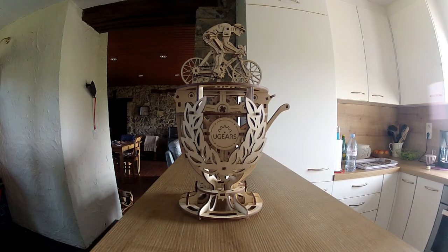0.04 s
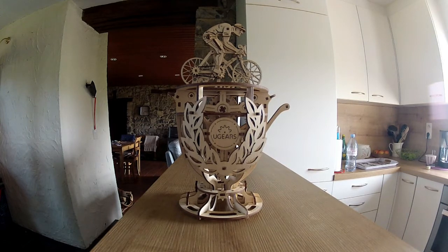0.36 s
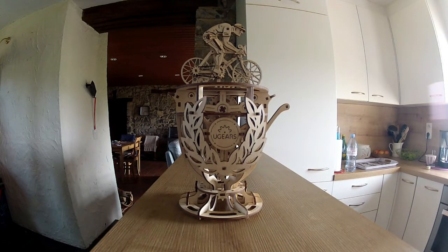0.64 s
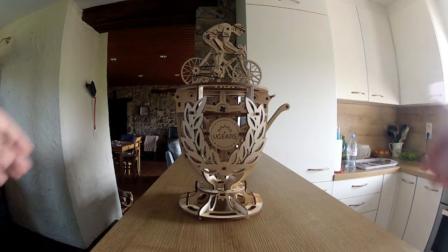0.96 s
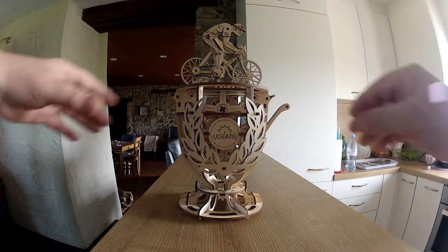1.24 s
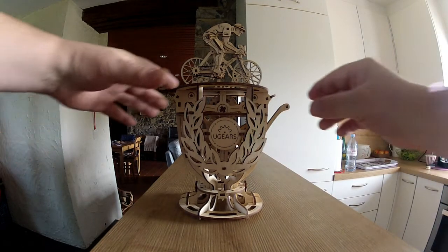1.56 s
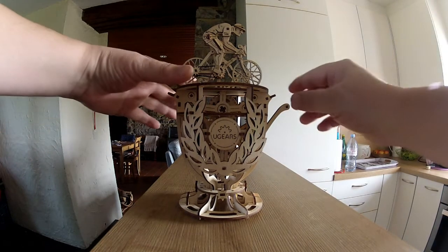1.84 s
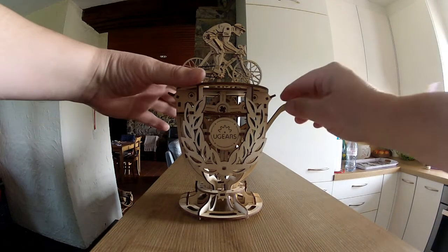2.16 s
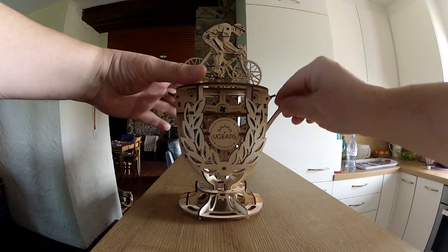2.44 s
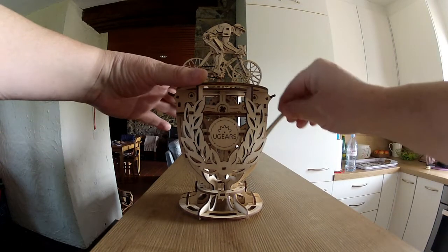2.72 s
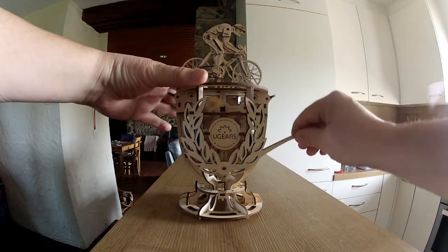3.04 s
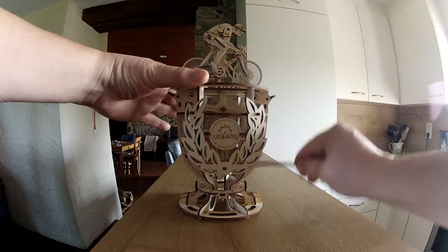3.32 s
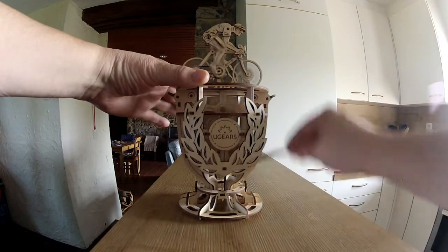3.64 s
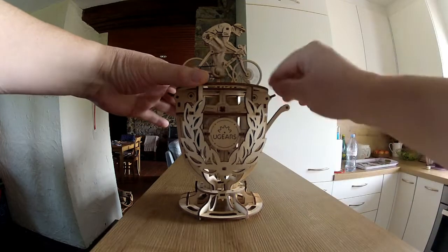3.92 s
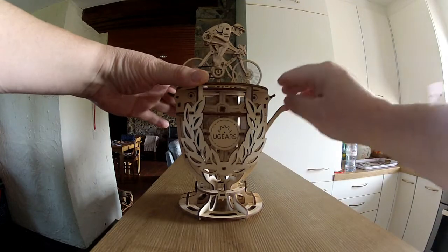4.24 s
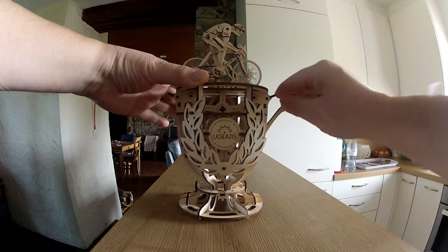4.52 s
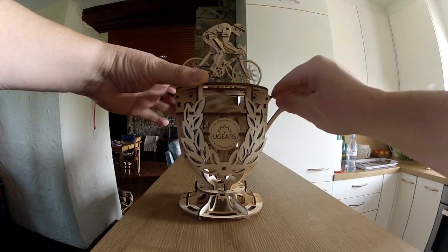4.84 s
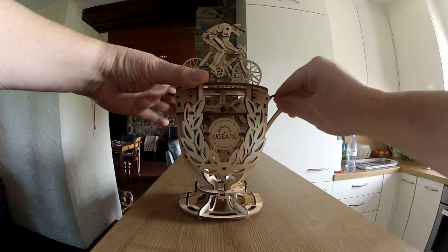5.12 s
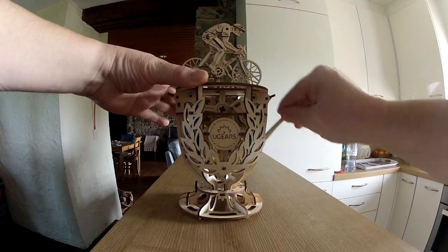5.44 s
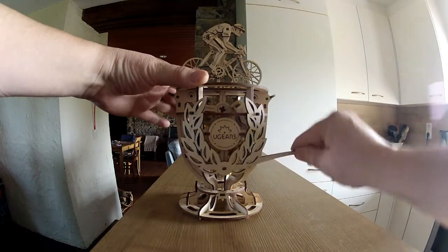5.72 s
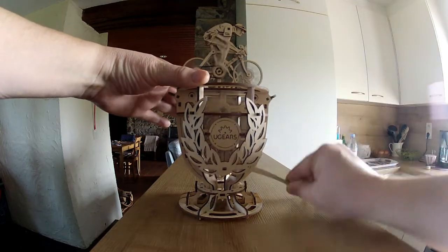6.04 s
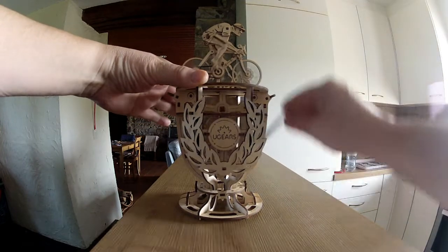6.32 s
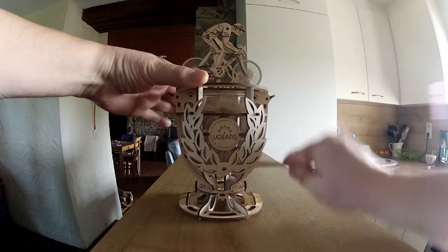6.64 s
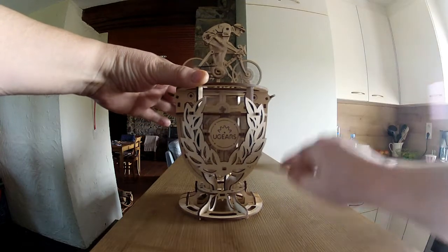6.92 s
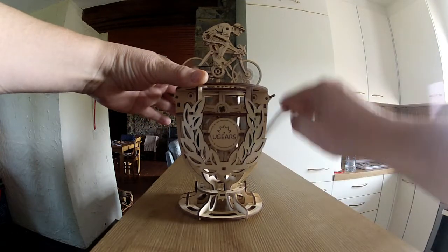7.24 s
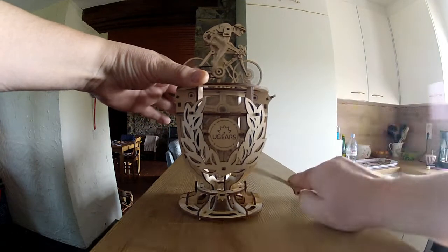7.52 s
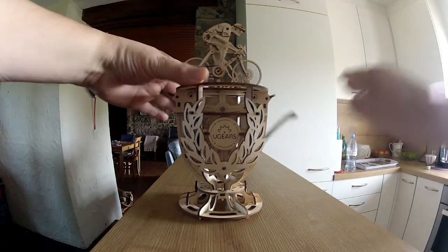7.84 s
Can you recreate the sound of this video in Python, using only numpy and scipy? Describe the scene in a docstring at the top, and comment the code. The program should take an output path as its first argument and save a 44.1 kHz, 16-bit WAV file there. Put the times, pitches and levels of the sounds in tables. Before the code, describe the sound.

In a quiet kitchen with a low appliance hum, a soft shuffle, a thin wooden rub and a hollow bump come first. Then the lever of a plywood gear model slides, catches with a knock and is pulled four times. Each pull shakes the hollow body and spins up the gears, which rattle as they slow while a ratchet clicks. The last pulls come closer together. The microphone is close, almost mono.

```python
"""A plywood gear model on a kitchen worktop, heard close up and almost in mono by a small camera.
Over the room tone come a soft shuffle, a thin rub of dry wood and a hollow bump. Then the slack lever
slides, catches and is pulled four times. Each pull judders the hollow frame and spins up the gears,
whose teeth rattle as they coast down while the pawl clicks. Throughout, the camera samples slowly
and holds each sample, which mirrors the sound into the treble."""
import sys
import numpy as np
from scipy import signal
from scipy.fft import rfft, irfft
from scipy.io import wavfile
from scipy.ndimage import uniform_filter1d

SR = 44100
rng = np.random.default_rng(int(sys.argv[2]) if len(sys.argv) > 2 else 0)


def store_pcm(level_fs):
    """Save levels as 16-bit WAV."""
    pcm = np.round(np.clip(level_fs, -1, 1) * 32767).astype(np.int16)
    wavfile.write(sys.argv[1], SR, np.atleast_2d(pcm).T)


N = 347067
TIME = np.arange(N) / SR
REFERENCE_TEETH_PER_S = 100  # the gear speed at which pace is 1

# ring of the small plywood gears: (frequency [Hz], level [dB])
GEAR_SPECTRUM = [(150, -21), (400, 5.5), (620, 1), (1000, -3.5), (1500, -5.5), (1900, -1.5), (2300, 3),
                 (2520, 3.5), (2700, 8.5), (3000, 1), (3400, -5.5), (3900, 1.5), (4900, -5), (6000, -13.5)]
# the slack lever slides before it bites: (start [s], end [s], hiss [Hz], hiss [dB], frame stir [dB])
LEVER_SLIDES = [(2.3, 3.3, 2570, -64, -49.5), (5.36, 6.0, 2560, -59.5, -46.5)]
# the lever catches a gear: (time [s], knock [dB], frame jolt [dB])
LEVER_CATCHES = [(2.94, -33.5, -32.5), (3.351, -28, -23), (3.662, -19, -39), (5.725, -22.5, -21.5),
                 (6.663, -11, -13), (7.075, -19.5, -16), (7.464, -19, -7), (7.778, -12.5, -45)]
# pulls of the lever: (time at the stop [s], stroke length [s], share spent speeding up [0-1],
# top speed [teeth/s], frame judder [dB], foot judder [dB])
LEVER_PULLS = [(3.42, .35, 0.92, 88.4, -24.5, -30), (6.031, 0.24, 0.93, 87, -23.5, -25.5),
               (6.759, 0.12, .45, 90, -23, -35), (7.528, .265, 0.76, 113, -17.5, -28.5)]


def undb(db):
    """Decibels to gain."""
    return 10 ** (np.asarray(db) / 20)


def unit(x):
    """Scale to rms 1."""
    return x / np.sqrt(np.mean(x ** 2))


def at_peak(x, db=0):
    """Scale to a peak level."""
    return undb(db) * x / np.abs(x).max()


def add(track, time, sound):
    """Mix a sound into a track at a time in seconds."""
    start = int(time * SR)
    track[start:start + len(sound)] += sound[:N - start]


def ring(x, response):
    """Pass a sound through an impulse response."""
    return signal.fftconvolve(x, response)[:len(x)]


def lowpass(x, hz, order=2):
    """Round off the treble."""
    return signal.sosfilt(signal.butter(order, hz, fs=SR, output="sos"), x)


def colour(points, size=8192):
    """Minimum-phase response of unit energy from (frequency [Hz], level [dB]) points."""
    hz, db = np.transpose(points)
    bins = np.maximum(np.fft.rfftfreq(size, 1 / SR), 1)
    gain = undb(np.interp(np.log(bins), np.log(hz), db))
    cepstrum = irfft(np.log(gain))
    cepstrum[1:size // 2] *= 2
    cepstrum[size // 2 + 1:] = 0
    response = irfft(np.exp(rfft(cepstrum)))
    return response / np.linalg.norm(response)


def modes(rows, size=8192):
    """Response of unit energy from damped modes: (frequency [Hz], width [Hz], level [dB])."""
    t = TIME[:size]
    response = sum(undb(db) * width * np.exp(-np.pi * width * t) * np.cos(2 * np.pi * hz * t)
                   for hz, width, db in rows)
    return response / np.linalg.norm(response)


def burst(t60, size=32768):
    """Noise of unit energy that dies by 60 dB in t60 seconds."""
    response = rng.standard_normal(size) * np.exp(-np.log(1000) * TIME[:size] / t60)
    return response / np.linalg.norm(response)


def strengths(spread_db):
    """Random gains scattered around 1."""
    return undb(spread_db * np.clip(rng.standard_normal(N), -2, 2))


def contacts(per_second, spread_db):
    """Random impacts of uneven strength."""
    struck = rng.random(N) < per_second / SR
    return struck * rng.choice([-1, 1], N) * strengths(spread_db)


def even(x, span_s):
    """Hold the rms near 1 over a short span, keeping the faster grain."""
    size = int(span_s * SR)
    power = uniform_filter1d(uniform_filter1d(x ** 2, size), size)
    return x / np.sqrt(np.abs(power) + 1e-12)


def swell(start, end, attack_s, release_s):
    """Rise from the start, hold until the end, then fade."""
    return np.clip((TIME - start) / attack_s, 0, 1) * np.clip(1 - (TIME - end) / release_s, 0, 1)


def steady_noise(response):
    """White noise through a response, at rms 1."""
    return unit(ring(rng.standard_normal(N), response))


def microphone_hiss():
    """Faint self-noise of the microphone channels."""
    # hiss spectrum: (frequency [Hz], density [dB])
    spectrum = [(60, -8.5), (400, -17.5), (1500, -22.5), (5000, -22)]
    return undb(-65) * steady_noise(colour(spectrum))


def kitchen():
    """Steady room tone with the low hum of an appliance."""
    # air of the quiet room: (frequency [Hz], density [dB])
    room_tone = [(15, -28), (25, -15.5), (54, -0.5), (71, -7.5), (101, -8), (156, -7), (174, -7), (244, -5),
                 (280, -6.5), (550, -14), (790, -21.5), (2730, -26), (5500, -30.5), (7150, -64),
                 (12100, -120)]
    # partials of the hum: (frequency [Hz], level [dB])
    hum_partials = [(50, -61.5), (99.5, -56.5)]
    air = undb(-52.5) * steady_noise(colour(room_tone))
    return air + sum(undb(db) * np.sin(2 * np.pi * hz * TIME) for hz, db in hum_partials)


def worktop():
    """Something shuffles on the worktop, with a tiny tick and a hollow bump."""
    # course of the shuffle: (time [s], level [dB])
    shuffle_levels = [(0, -50.5), (.13, -49), (.35, -48), (.5, -51.5), (.66, -51), (.82, -72), (1.1, -99)]
    # worktop resonances under the shuffle and the bump: (frequency [Hz], width [Hz], level [dB])
    shuffle_modes = [(272, 31, 12), (560, 35, 7.5), (640, 30, -17), (1960, 380, -10), (2620, 260, -19)]
    bump_modes = [(266, 37, 13.5), (430, 37, 2), (1700, 340, -15.5), (1940, 420, -13.5)]
    out = steady_noise(modes(shuffle_modes)) * undb(np.interp(TIME, *np.transpose(shuffle_levels)))
    blow = burst(t60=.33)
    blow[0] += .5  # the blow itself arrives ahead of its echoes
    bump = lowpass(ring(blow, modes(bump_modes)), hz=2590, order=4)
    add(out, time=.558, sound=at_peak(bump, db=-29.5))
    tick = ring(burst(t60=.04), modes([(3600, 400, 0)]))
    add(out, time=.14, sound=at_peak(tick, db=-42))
    return out


def friction_hiss(centre_hz):
    """Friction noise in one narrow resonance."""
    grain = lowpass(rng.standard_normal(N) + 1j * rng.standard_normal(N), hz=112)
    return unit(np.real(grain * np.exp(2j * np.pi * centre_hz * TIME)))


def rubbing():
    """Thin hisses: first as of dry wood rubbing, later from the sliding of the slack lever."""
    # opening rubs: (start [s], end [s], frequency [Hz], level [dB])
    early_rubs = [(0, 0.126, 2765, -54), (0.248, 0.663, 2605, -64.5)]
    rubs = sum(undb(db) * friction_hiss(hz) * swell(start, end, attack_s=.061, release_s=.18)
               for start, end, hz, db in early_rubs)
    slides = sum(undb(db) * friction_hiss(hz) * swell(start, end, attack_s=.21, release_s=.19)
                 for start, end, hz, db, _ in LEVER_SLIDES)
    return rubs + slides


def stroke(stop, length_s, share):
    """Speed of the lever, 0 to 1: it picks up evenly, then holds."""
    return np.clip((TIME - stop + length_s) / (length_s * share), 0, 1)


def lever(scrape_lead_s=.009):
    """The lever scrapes a tooth, knocks against the gear, rings briefly and sets loose parts buzzing."""
    # ring of the lever: (frequency [Hz], width [Hz], level [dB])
    lever_modes = [(2050, 440, -48), (2690, 160, 4), (2970, 270, -4.5), (3800, 570, -9.5)]
    wood, loose_parts = modes(lever_modes), colour(GEAR_SPECTRUM)
    out = np.zeros(N)
    for time, db, _ in LEVER_CATCHES:
        knock = wood + undb(6) * ring(wood, burst(t60=.022))
        buzz = undb(2) * ring(loose_parts, burst(t60=.08))
        scrape = ring(loose_parts, burst(t60=.072))
        add(out, time, at_peak(knock + buzz, db))
        add(out, time - scrape_lead_s, at_peak(scrape, db - 18))
    return out


def frame(pace, judder_t60_s=.53, stop_boost_db=15):
    """Loaded teeth stick and slip, shaking the frame and its foot; stops and catches jolt both."""
    # ring of the hollow frame: (frequency [Hz], level [dB])
    frame_spectrum = [(60, -44), (175, -18), (210, 1), (233, 6.5), (255, -2.5), (292, 5), (322, -2.5),
                      (346, 3.5), (385, -9.5), (420, -17.5), (452, -8.5), (520, -21), (680, -20.5),
                      (1100, -37.5)]
    # the foot on the worktop: (frequency [Hz], width [Hz], level [dB])
    foot_modes = [(101, 69, -2.5), (118.6, 7.9, 20), (154, 11, -9)]
    body = colour(frame_spectrum)
    low_cut = signal.butter(3, 75, "high", fs=SR, output="sos")
    foot = lowpass(signal.sosfilt(low_cut, modes(foot_modes)), hz=151, order=4)
    jolt = at_peak(body) + at_peak(foot, db=-17)
    # the rumble is uneven as the wooden wheels run a little out of true
    uneven_db = 1.8 * unit(lowpass(rng.standard_normal(N), hz=15))
    rumble = pace ** 1.04 * undb(uneven_db)
    body_gain, foot_gain = undb(-35) * rumble, undb(-42.5) * rumble
    jolts = np.zeros(N)
    for stop, length_s, share, _, judder_db, foot_db in LEVER_PULLS:
        decay = np.exp(-np.log(1000) * np.maximum(TIME - stop, 0) / judder_t60_s)
        judder = stroke(stop, length_s, share) ** 1.61 * decay
        body_gain = np.hypot(body_gain, undb(judder_db) * judder)
        foot_gain = np.hypot(foot_gain, undb(foot_db) * judder)
        add(jolts, stop, undb(judder_db + stop_boost_db) * jolt)
    for start, end, _, _, stir_db in LEVER_SLIDES:
        stir = swell(start, end, attack_s=.47, release_s=.19)
        body_gain = np.hypot(body_gain, undb(stir_db) * stir)
    for time, _, jolt_db in LEVER_CATCHES:
        add(jolts, time, undb(jolt_db) * jolt)
    slips = contacts(per_second=240, spread_db=1)
    body_shake = body_gain * even(ring(slips, body), span_s=.022)
    foot_shake = foot_gain * even(ring(slips, foot), span_s=.084)
    return jolts + body_shake + foot_shake


def click(snap, wood):
    """One snap with a brief chatter, and the plywood around it ringing on; peak 1."""
    return at_peak(ring(burst(t60=.024), snap) + undb(-1) * ring(burst(t60=.08), wood))


def pawl(pace):
    """The pawl ticks over the ratchet, faster and louder with speed, and now and then snaps hard."""
    # ring of the thin pawl: (frequency [Hz], level [dB])
    pawl_spectrum = [(300, -2), (1500, 9), (2600, -31), (3300, 10), (4200, 10.5), (5200, 11), (6200, -7)]
    # its sharpest snaps: (time [s], peak level [dB])
    hard_snaps = [(2.9143, -35.5), (3.7826, -21), (3.9135, -23), (3.9919, -26.5), (4.067, -25.5),
                  (4.1941, -32.5), (4.2143, -35), (4.2703, -34), (4.2896, -29), (4.3113, -31),
                  (4.3342, -28), (4.4199, -30.5), (4.6563, -33), (4.6984, -36.5), (4.8627, -37),
                  (4.9506, -41.5), (5.7107, -32), (6.2092, -31), (6.481, -21), (6.6747, -18),
                  (6.8988, -24.5), (7.0255, -26), (7.0768, -25), (7.1287, -29), (7.141, -23.5),
                  (7.2196, -27.5), (7.3194, -24), (7.3368, -23.5), (7.7778, -14.5)]
    snap, wood = colour(pawl_spectrum), colour(GEAR_SPECTRUM)
    ticks = contacts(per_second=28 * pace, spread_db=5) * pace ** .7
    out = undb(-33) * ring(ticks, click(snap, wood))
    for time, db in hard_snaps:
        add(out, time, undb(db) * click(snap, wood))
    return out


def gear_speed(spin_lag_s=.022, friction_teeth_per_s2=50):
    """Teeth per second, at least 1: the lever drives the gears when it outruns them, else they coast."""
    speed = np.ones(N)
    for stop, length_s, share, top_speed, _, _ in LEVER_PULLS:
        release = stop + spin_lag_s  # the wheels' inertia makes the gears follow late
        driven = top_speed * stroke(release, length_s, share)
        lost = friction_teeth_per_s2 * np.maximum(TIME - release, 0)
        speed = np.maximum(speed, driven - lost)
    return speed


def wheel(mesh_hz, chatter_s=.0028):
    """One wheel: each tooth lands with its own strength and chatters; the wood rings with dense modes."""
    wobble = unit(lowpass(rng.standard_normal(N), hz=24.22))
    teeth_passed = np.cumsum(mesh_hz * (1 + .12 * wobble)) / SR
    strength = strengths(spread_db=2.2)[teeth_passed.astype(int)]
    since_tooth_s = teeth_passed % 1 / mesh_hz
    chatter = strength * np.exp(-since_tooth_s / chatter_s) * contacts(per_second=7000, spread_db=2)
    return unit(chatter + undb(9.5) * ring(chatter, burst(t60=.073)))


def gears(pace, wheel_count=3, speed_ratio=.75):
    """A train of wheels, each slower than the last: teeth rattle and flanks scrape, louder with speed."""
    mesh_hz = pace * REFERENCE_TEETH_PER_S
    teeth = unit(sum(wheel(mesh_hz * speed_ratio ** k) for k in range(wheel_count)))
    scrape = undb(-.5) * rng.standard_normal(N)
    rattle = even(ring(teeth + scrape, colour(GEAR_SPECTRUM)), span_s=.42)
    return undb(-33) * pace ** 1.85 * rattle


def scene():
    """The model close to the microphone, with a short echo off the kitchen walls; a narrow image."""
    pace = gear_speed() / REFERENCE_TEETH_PER_S
    model = gears(pace) + pawl(pace) + lever() + rubbing()
    walls = np.pad(burst(t60=.49), (SR // 200, 0))  # 5 ms behind the direct sound
    mid = frame(pace) + model + undb(-8) * ring(model, walls) + worktop() + kitchen()
    side = undb(-39) * ring(model, burst(t60=.032)) + microphone_hiss()
    return np.array([mid + side, mid - side])


def record(dry, sample_hz=12000, hold=4, top_hz=15300):
    """The camera holds each slow sample for several fast ones, so mirror images appear in the treble."""
    band_limited = lowpass(dry, hz=5650, order=7)
    fast = signal.resample_poly(band_limited, hold * sample_hz, SR, axis=1)
    held = np.repeat(fast[:, ::hold], hold, axis=1)
    mirrored = signal.resample_poly(held, SR, hold * sample_hz, axis=1)[:, :N]
    softened = lowpass(mirrored, hz=14900, order=1)
    steep_cut = signal.ellip(10, .2, 70, top_hz, fs=SR, output="sos")
    return signal.sosfilt(steep_cut, softened)


dry = scene()
out = record(dry)
store_pcm(out)
```